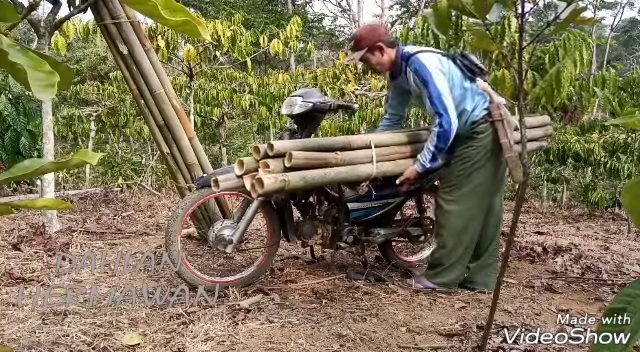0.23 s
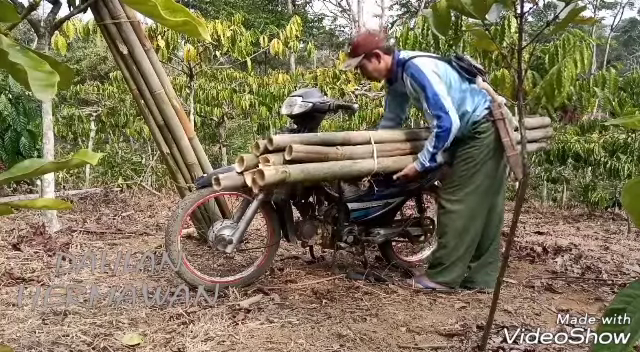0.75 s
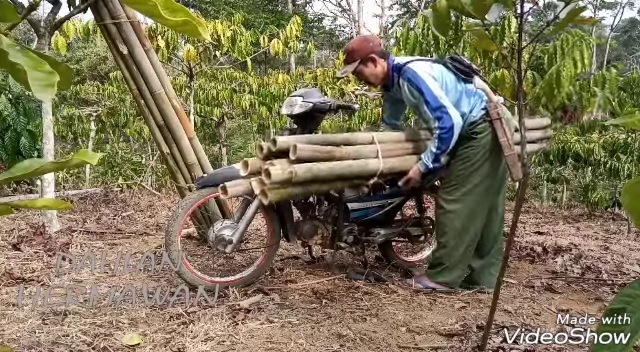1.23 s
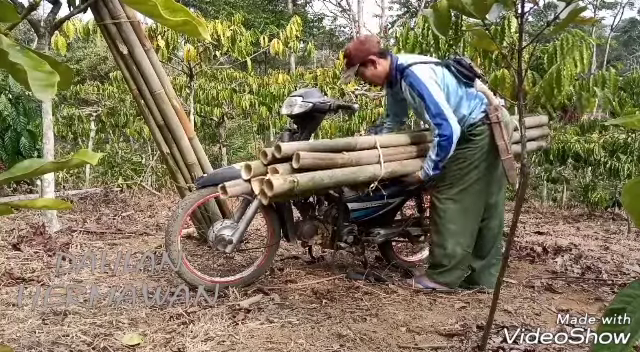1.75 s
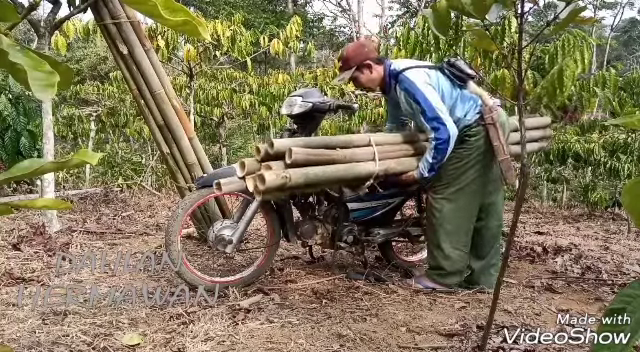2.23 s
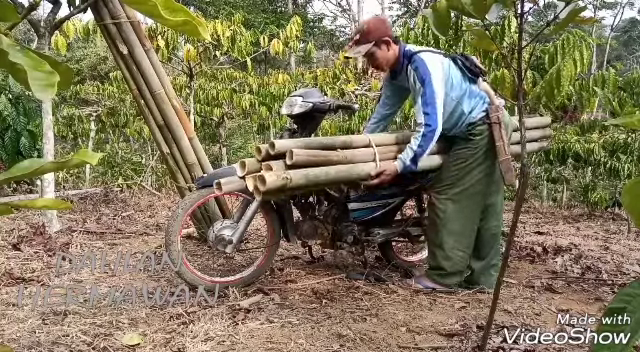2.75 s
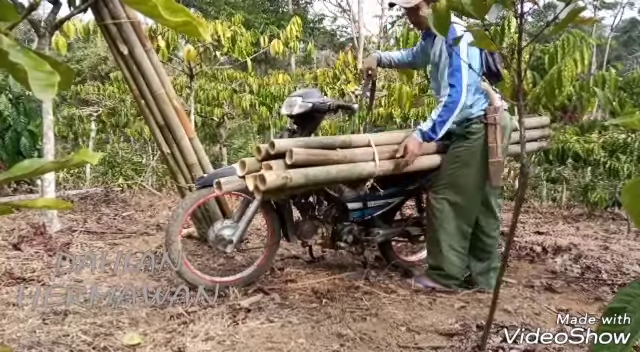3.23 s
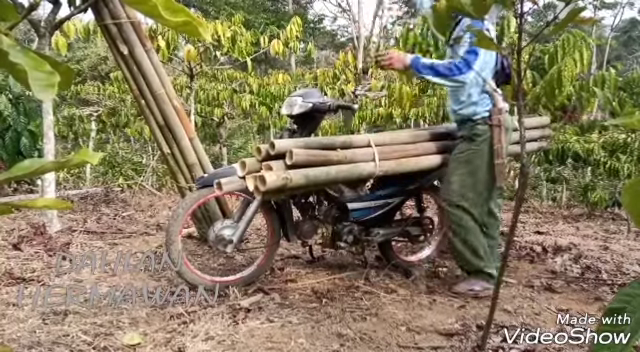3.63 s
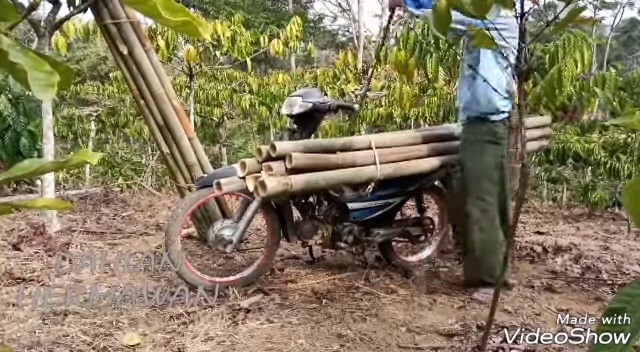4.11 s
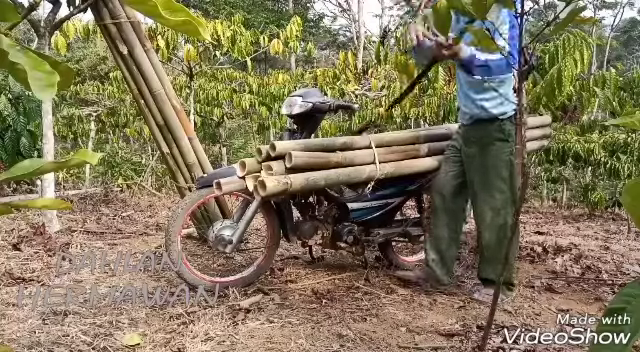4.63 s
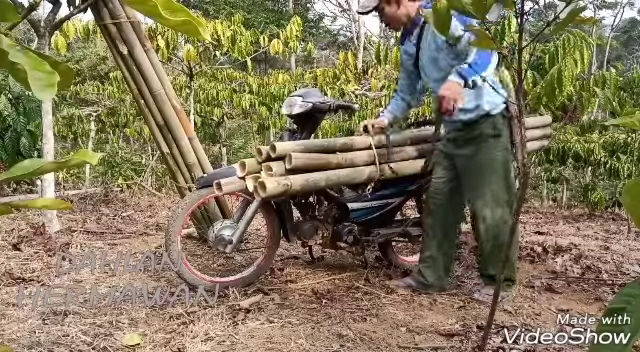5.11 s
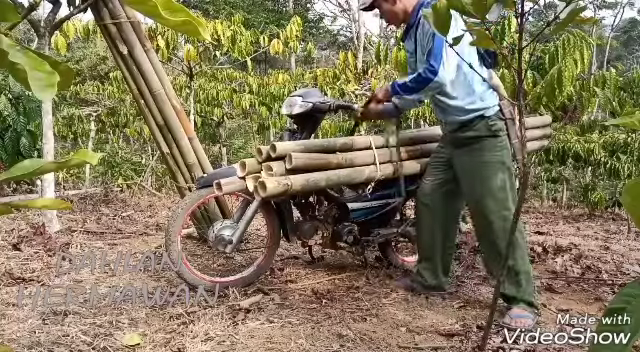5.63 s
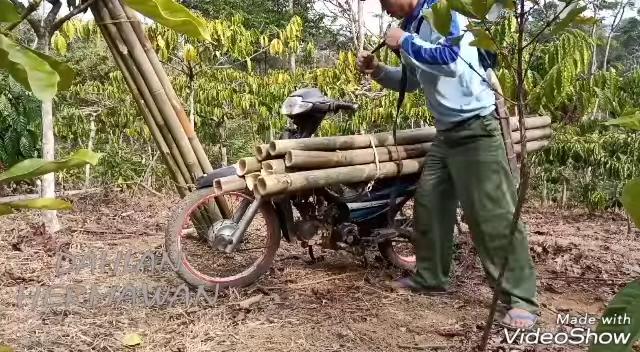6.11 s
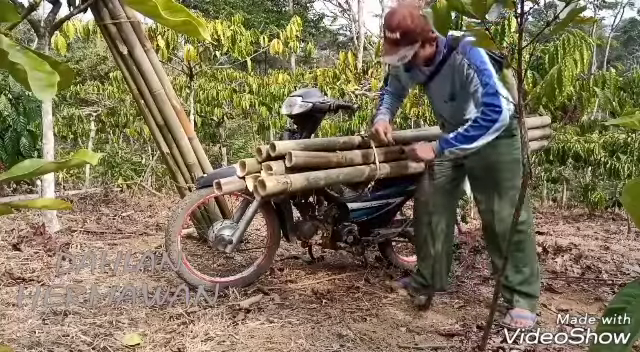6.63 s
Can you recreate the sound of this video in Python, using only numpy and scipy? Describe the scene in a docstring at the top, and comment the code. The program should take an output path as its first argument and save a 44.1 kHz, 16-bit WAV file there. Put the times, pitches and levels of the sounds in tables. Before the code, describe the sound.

Hollow bamboo poles clatter loudly onto a motorbike rack, knock and scrape sparsely, then a strap swishes over them with dry litter crunching outdoors.

```python
"""A low, distant rumble with leaf hiss lies under the whole outdoor scene: filtered noise.
From 0.2 s bamboo poles are shoved into place on a motorbike rack. Decaying modes make their knocks and hollow
notes, and stick-slip clicks their scrapes; they grow sparse after 2.4 s. Sharp snaps, as noise bursts, begin at 1.3 s.
From 2.8 s a strap is drawn out and laid over the bundle, swishing as swells of clicks; a drone passes at 3 to 4.5 s.
Dry litter crunches underfoot near 3.3 and 5.5 s, as clumped tiny breaks; one mono mix feeds both channels."""
import sys
import numpy as np
from scipy import signal
from scipy.fft import rfft, irfft
from scipy.io import wavfile

SR = 44100
rng = np.random.default_rng(int(sys.argv[2]) if len(sys.argv) > 2 else 0)


def output_pcm(signal):
    """Save a mono or channel-first signal as 16-bit PCM at the path in sys.argv[1].

    Samples are clipped to [-1, 1] before scaling.
    """
    pcm = np.clip(np.atleast_2d(signal).T, -1, 1) * 32767
    wavfile.write(sys.argv[1], SR, np.round(pcm).astype(np.int16))


N = 302526  # length in samples
RING = np.arange(SR // 2) / SR  # time axis of one short sound, t/s
LN_60_DB = np.log(1000)  # a fall of 60 dB as a natural logarithm


def amp(db):
    """Level law: decibels to amplitude gain."""
    return 10 ** (np.asarray(db) / 20)


def unit(x):
    """Normalisation to a root-mean-square value of one."""
    return x / np.sqrt(np.mean(x ** 2) + 1e-20)


def unit_attack(x, size=300):
    """Onset normalisation: the first size samples receive an rms of one."""
    return x / np.sqrt(np.mean(x[:size] ** 2) + 1e-20)


def read(points, hz):
    """Interpolation of (f/Hz, value) points on a logarithmic frequency axis."""
    f, value = np.transpose(points)
    return np.interp(np.log(hz + 1), np.log(f + 1), value)


def add(mix, s, sound):
    """Superposition: adds a sound to the mix in place from time s."""
    part = mix[max(round(s * SR), 0):][:len(sound)]
    part += sound[:len(part)]


def colour(x, points, size=4096):
    """Minimum-phase filtering: a causal response with the given (f/Hz, level/dB) magnitude."""
    hz = abs(np.fft.fftfreq(size, 1 / SR))
    log_gain = np.log(amp(read(points, hz)))
    # the Hilbert transform of the log magnitude gives the minimum phase
    taps = np.fft.ifft(np.exp(np.conj(signal.hilbert(log_gain)))).real
    return signal.oaconvolve(x, taps[:size // 2])[:len(x)]


def resonances(x, peaks):
    """Resonance: the sum of band-pass responses (f/Hz, width/Hz, level/dB) to a sound."""
    out = 0
    for hz, width, db in peaks:
        b, a = signal.iirpeak(hz, hz / width, fs=SR)
        out = out + amp(db) * signal.lfilter(b, a, x)
    return out


def drift(per_s):
    """Band-limited random modulation of unit rms, from per_s random values a second."""
    values = rng.standard_normal(int(per_s * N / SR) + 2)
    return unit(signal.resample(values, N))


def grains(per_s, spread_db):
    """Shot noise: random clicks of either sign and uneven size."""
    clicks = rng.random(N) < per_s / SR
    signs = rng.choice([-1, 1], N)
    sizes = amp(spread_db * np.minimum(rng.exponential(1, N), 4))
    return unit(clicks * signs * sizes)


def chatter(size, per_s=240, unevenness_db=4):
    """Intermittent contact: a gain that catches and lets go in quick uneven bursts."""
    bursts = np.arange(size) * per_s / SR
    steps = rng.uniform(-0.71, 1, int(bursts[-1]) + 2) * np.sqrt(3)
    return unit(amp(unevenness_db * np.interp(bursts, np.arange(len(steps)), steps)))


def gesture(start, length, db, shape):
    """Force envelope of one push or pull: attack, a sagging hold, release."""
    attack_s, sag_db, release_s = shape
    t = np.maximum(np.arange(N) / SR - start, 0)
    attack = 1 - np.exp(-(t / attack_s) ** 2)
    hold = amp(db - sag_db * np.minimum(t / length, 1))
    release = np.exp(-np.maximum(t - length, 0) / release_s)
    return attack * hold * release


def swell(s, width_s, db):
    """Gaussian envelope: a gain that rises smoothly to a peak at time s and falls again."""
    t = np.arange(N) / SR - s
    return amp(db) * np.exp(-np.minimum((t / width_s) ** 2, 20))


# outdoor background spectrum: f/Hz, relative level per Hz/dB
AIR_SPECTRUM = [(20, -13), (45, -20.5), (75, -4), (110, 1), (190, 0), (320, -9), (600, -13), (1300, -15.5),
                (3200, -20), (4500, -23), (5800, -32), (8000, -36.5), (11000, -56.5), (15000, -40)]
# spectrum of the distant drone: f/Hz, relative level/dB
DRONE_SPECTRUM = [(120, -42), (165, 2.5), (188, 10), (225, 14), (300, -44.5)]
AIR_DB = -46
DRONE_SWELL = (3, 1.45, -52.5)  # start/s, length/s, level/dB
DRONE_SHAPE = (0.15, 1, 0.12)  # attack/s, sag/dB, release/s


def background(waver_db=0.5):
    """Filtered noise: distant rumble and leaf hiss waver gently, and a low drone passes."""
    air = unit(colour(rng.standard_normal(N), AIR_SPECTRUM))
    air_gain = amp(AIR_DB + waver_db * drift(per_s=6.1))
    drone = unit(colour(rng.standard_normal(N), DRONE_SPECTRUM))
    return air_gain * air + gesture(*DRONE_SWELL, DRONE_SHAPE) * drone


# modes of three kinds of pole, before tuning and damping: f/Hz, relative level/dB, t60/s
POLE_MODES = { "long": [(216, 2, 0.29), (351, 0.5, 0.27), (569, 2, 0.35), (691, -8, 0.33), (766, -22, .28),
              (930, -1, 0.29), (1145, 12, 0.15), (1210, 0, .22), (1360, 6, .07), (1460, 5.5, 0.18),
              (1600, -1, 0.015), (1824, 12.5, 0.049), (2010, 2, .15), (2120, 5.5, 0.18), (2530, 16, 0.049),
              (2855, 10.5, 0.054), (3600, -3, 0.02), (3720, -3, 0.068)], "wide": [(215.6, -4, 0.32),
              (371, -8, .15), (520, -30, .25), (708, -6.5, 0.22), (941, 7, 0.099), (1043, 6, 0.099),
              (1214, 1.5, 0.076), (1294, 0, 0.12), (1370, -4, 0.14), (1595, -15, 0.087),
              (1667, -2.5, 0.051), (1918, -19, 0.15), (2134, -3, 0.13), (2790, -19, .025)],
              "short": [(234, -11.5, 0.34), (380, -21.5, 0.22), (543, -9.5, 0.26), (670, -11, 0.15),
              (942, -19.5, 0.19), (1130, -39, 0.015), (1185, 4.5, 0.068), (1270, -5, .047),
              (1735, 11, 0.03), (1860, -0.5, 0.041), (2263, -3.5, 0.065), (2950, -3, 0.063),
              (3285, -8, 0.088)]}


def pole_ring(pole, tuning, damping):
    """Modal superposition: one hollow pole rings freely, damped by the poles that lie on it."""
    modes = 0
    for hz, db, t60 in POLE_MODES[pole]:
        decay = np.exp(-LN_60_DB * damping * RING / t60)
        modes = modes + amp(db) * decay * np.sin(2 * np.pi * hz * tuning * RING)
    return unit_attack(modes)


# decay of the dense ring at a damping of one: f/Hz, t60/s
DENSE_T60 = [(100, 0.4), (400, 0.24), (1200, 0.16), (3000, 0.15), (8000, 0.21)]


def dense_ring(points, damping):
    """High modal density: overlapping modes act as noise whose decay depends on frequency."""
    hz, t, z = signal.stft(rng.standard_normal(len(RING)), SR, nperseg=256)
    fade = amp(-60 * t * damping / read(DENSE_T60, hz)[:, None])
    noise = signal.istft(z * fade, SR, nperseg=256)[1]
    return colour(noise[:len(RING)], points)


def disperse(x, lag_s, fast_hz=2200, slow_hz=170):
    """Dispersion: bending waves travel with the root of f, so the bass trails in a falling chirp."""
    hz = np.fft.rfftfreq(2 * len(x), 1 / SR)
    delay = lag_s * np.maximum(np.sqrt(fast_hz / np.maximum(hz, slow_hz)) - 1, 0)
    phase = -2 * np.pi * np.cumsum(delay) * hz[1]  # phase is the integral of group delay
    return irfft(rfft(x, 2 * len(x)) * np.exp(1j * phase))[:len(x)]


# knocks: t/s, kind of pole, tuning factor, relative level/dB, contact hardness f/Hz,
# bundle rattle relative level/dB, rack thump relative level/dB, grip damping factor
KNOCKS = [ (0.219, "long", 1, -12, 4760, -2.5, -3.5, 1.3), (0.2248, "short", 1.07, -22, 3000, 4.5, 3, 1.3),
          (0.2297, "wide", 1, -18, 1600, -5, -3, 2), (0.2427, "long", 1, -19, 3180, -4, -3, 1.4),
          (0.2499, "long", 1, -21.5, 3800, 1, -8, 1.6), (0.2529, "short", 1.05, -16, 2780, 0, -9, 1.1),
          (0.2582, "wide", .985, -16, 2600, -8, -2, 1.17), (0.2742, "long", 1, -23.5, 3640, -4, 4.5, 1.4),
          (0.293, "long", 1, -31.5, 4100, 3, -8, 2.1), (0.3027, "wide", 1, -26.5, 3600, -4, -1, 1.3),
          (0.311, "short", 1.1, -30.5, 2900, -11, -4, 1.8), (.316, "short", 1, -29.5, 3000, -1, -12, 1.9),
          (0.374, "short", 1.32, -37, 2980, -25, 2.5, 2),
          (0.398, "short", 1.87, -41.5, 3650, -11, -17, 0.95),
          (0.4372, "short", 1.35, -39, 3000, -18, -26, 1.4),
          (0.5605, "long", 0.77, -51.5, 1300, 12.5, 16.5, 1.5),
          (.585, "short", 1.3, -40.5, 2620, -5, -17, 2.2),
          (0.7549, "short", 0.93, -41, 5100, 1.5, -31, 1.2),
          (0.7658, "short", 0.94, -13, 4300, -10.5, -13, 0.87),
          (0.7694, "wide", 1, -17, 2000, -7, -14, 0.96), (0.7765, "wide", 1, -15, 2680, -1.5, -13, 1.26),
          (0.832, "short", 1.05, -35.5, 3020, -20, -13, 1.5),
          (0.8731, "wide", 1.04, -38, 2500, -17, 5, 1.2), (0.897, "short", 1.1, -38, 2800, -11, -12, 1),
          (0.9227, "short", 1.17, -33, 2610, -1, -6, 0.89),
          (0.93, "short", 1.1, -40.5, 2700, -6, -14, 0.78), (0.988, "wide", 1.1, -41.5, 2400, 4, 2, 1.2),
          (1.082, "wide", 0.92, -43, 1300, -7, -2, 2.3), (1.104, "short", 1.6, -43.5, 4080, 4, -10, 1.3),
          (1.15, "wide", 1.04, -29.5, 2080, 0.5, 0, 2.8), (1.153, "short", 1.05, -28.5, 3020, -3, -12, 1.4),
          (1.158, "long", 1, -34.5, 3380, 0.5, -14, 1.7), (1.174, "wide", 1, -29, 1800, -3, 2.5, 1.8),
          (1.2, "short", 1.15, -45, 2980, -1, -10, 1.3), (1.2103, "long", 1, -37, 3200, -7, -8, 1.5),
          (1.222, "short", 1.1, -37, 2900, 2, -10, 1.1),
          (1.2325, "short", 1.1, -27.5, 2150, -2.5, -11, 1.26), (1.285, "short", 1.1, -48, 3200, -5, -5, 1),
          (1.479, "wide", 1, -43, 2000, 4, 8.5, 0.36), (1.5164, "short", 1.15, -28, 2580, -8, -18, 1.5),
          (1.544, "short", 1.2, -39, 3000, -10, -10, 1.2), (1.556, "wide", 1.1, -40, 2200, 2, -13, 1.5),
          (1.574, "short", 1.1, -28.5, 2700, -8, -8, 1.3), (1.582, "short", 1.05, -35, 2400, 1, -7, 1.4),
          (1.6048, "long", 1, -29.5, 3520, -10, 5.5, 0.99), (1.612, "wide", 1, -28, 2500, 3, 0, 1.5),
          (1.6178, "short", 1.05, -28.5, 2980, -8, -21, 1.4), (1.646, "short", 1, -38, 2400, -12, -10, 1.5),
          (1.849, "short", 1.7, -35.5, 4560, 1.5, 4.5, 1.3), (1.8669, "short", 1, -14, 3520, -8, -10, 1.13),
          (1.893, "wide", 1, -36.5, 1100, -3, 6, 0.91), (1.968, "short", 1.1, -45, 3800, -8, 3, 1.1),
          (2.069, "short", 1.1, -44.5, 2200, 6, -20, 0.78), (2.166, "short", 1.1, -43, 2400, 1, -12, 1),
          (2.2248, "wide", .86, -27, 1750, -1, -1, 1.1), (2.318, "wide", 1.17, -36, 2200, -5, 7, 0.74),
          (2.347, "short", 0.9, -40, 2300, 5.5, 7.5, 0.55), (3.396, "wide", 0.69, -43.5, 1180, 0, 3.5, 1.1),
          (3.9968, "short", 1.02, -36, 1900, 6, -16, 1.8), (4.041, "short", 1.05, -39, 1700, 0, 0, 0.7),
          (4.282, "short", 1.1, -43.5, 1730, 3, -24, 1.2),
          (4.8953, "wide", 1.3, -34, 2150, -0.5, -23, 1.36),
          (5.285, "long", 0.94, -28.5, 4300, -10, -6, 6.7),
          (5.295, "wide", 0.77, -35.5, 2860, 0, -11, 0.91),
          (5.408, "short", 1.3, -42.5, 3600, 0.5, 0, 0.77), (6.58, "short", 1, -40.5, 4270, -3, -17, 2)]
# dense ring of the whole bundle: f/Hz, relative level/dB
BUNDLE_SPECTRUM = [(60, -15), (200, -2), (400, -22.5), (750, -5.5), (1200, 1), (2000, -2), (3000, -7),
                   (4200, -8), (7000, -18.5), (15000, -48)]
# dense ring of the rack below it: f/Hz, relative level/dB
RACK_SPECTRUM = [(30, 9), (60, -17), (85, -0.5), (140, -6.5), (230, -1.5), (420, -1), (800, -8),
                 (3000, -55)]
# crack of the hard bamboo skin: f/Hz, relative level/dB
CRACK_SPECTRUM = [(500, -32), (1500, 12.5), (3000, 7), (4500, -9), (6000, -4.5), (8000, -16), (11000, -11),
                  (15000, -22)]
# scale of the bass delay for a 0 dB blow, and the drop in level that halves it
BASS_LAG_S, LAG_HALVING_DB = 0.003127, 26


def knocks(rack_damping=0.95, bundle_damping=1.87, leak_db=-23,
           crack_db=-3, crack_t60=0.023, full_crack_hz=4500, crack_power=2.3):
    """Impact excitation: a blow cracks the skin, rings a pole, rattles the bundle, thumps the rack."""
    out = np.zeros(N)
    for s, pole, tuning, db, hard_hz, rattle_db, thump_db, grip in KNOCKS:
        rattle = chatter(len(RING)) * dense_ring(BUNDLE_SPECTRUM, bundle_damping * grip)
        wood = pole_ring(pole, tuning, grip) + amp(rattle_db) * unit_attack(rattle, size=700)
        # a soft contact lasts longer and wakes less treble
        contact = signal.butter(2, min(hard_hz, SR / 3), fs=SR, output="sos")
        body = signal.sosfilt(contact, wood) + amp(leak_db) * wood
        # the crack grows steeply with hardness
        burst = rng.standard_normal(len(RING)) * np.exp(-LN_60_DB * RING / crack_t60)
        crack_gain = amp(crack_db) * (hard_hz / full_crack_hz) ** crack_power
        crack = crack_gain * unit_attack(colour(burst, CRACK_SPECTRUM))
        rack = dense_ring(RACK_SPECTRUM, rack_damping * grip)
        thump = amp(thump_db) * unit_attack(rack, size=2000) / 2
        # the bass trails further after a heavy blow
        lag_s = BASS_LAG_S * 2 ** (db / LAG_HALVING_DB)
        add(out, s, amp(db) * (crack + thump + disperse(body, lag_s)))
    return out


# air columns in the open tubes: f/Hz, width/Hz, relative level/dB
TUBE_RESONANCES = [(240.5, 13, 0), (379.5, 28, -3), (545.3, 8, 1.5), (700, 41, -0.5), (792, 12, -1),
                   (932, 41, -4), (1262, 69, -5.5), (1444, 14, -16)]


def tubes(x, gain_db=-2):
    """Sympathetic resonance: the hollow poles answer every blow and scrape at their own notes."""
    return amp(gain_db) * (x + resonances(x, TUBE_RESONANCES))


# soft bumps that sound one pole's air column: t/s, note f/Hz, level/dB, t60/s
HOOTS = [(0.224, 213, -25, 0.071), (0.262, 403, -23, 0.07), (0.356, 347, -39, 0.14),
         (0.79, 374, -13.5, 0.066), (.814, 237.4, -19.5, 0.15), (0.991, 552, -29, 0.094),
         (1.078, 413, -30.5, 0.095), (1.153, 230, -47, 0.11), (1.176, 960, -35, 0.068),
         (1.89, 220, -34, .2), (2.222, 155, -34, 0.14), (2.246, 231, -35, 0.22), (5.519, 546, -29.5, 0.054)]
HOOT_RISE_S = 0.0044  # the air takes about this long to swing up


def hoots(overtone_db=-16):
    """Air-column resonance: a bumped pole sounds a short hollow note with a weak octave."""
    out = np.zeros(N)
    for s, hz, db, t60 in HOOTS:
        turn = 2 * np.pi * hz * RING
        rise = 1 - np.exp(-(RING / HOOT_RISE_S) ** 2)
        fade = rise * np.exp(-LN_60_DB * RING / t60)
        note = np.sin(turn) + amp(overtone_db) * np.sin(2 * turn)
        add(out, s, amp(db) * np.sqrt(2) * fade * note)
    return out


# slides of the poles on each other: start t/s, length t/s,
# scrape relative level/dB, rack rumble relative level/dB
SLIDES = [(0.24, 0.086, -32.5, -35), (0.348, 0.255, -46.5, -67), (0.78, 0.21, -32.5, -35.5),
          (1.068, 0.051, -37, -34), (1.141, 0.092, -34.5, -44), (1.267, 0.11, -46.5, -53),
          (1.429, 0.21, -44, -42), (1.513, 0.12, -41, -36.5), (1.877, 0.024, -33, -25.5),
          (1.95, 0.14, -43.5, -55), (2.067, 0.24, -41, -51), (2.21, 0.22, -46.5, -39.5),
          (3.912, 0.18, -43.5, -54), (4.87, 0.014, -43, -62), (4.97, 0.042, -42, -61),
          (5.572, .012, -46, -60)]
# colour of the sliding poles: f/Hz, relative level/dB
SLIDE_SPECTRUM = [(80, 7.5), (250, 0.5), (600, -3), (1300, -4.5), (3000, -0.5), (6000, -13.5), (15000, 6)]
# a slide catches, loses a little force as it goes, and stops: attack/s, sag/dB, release/s
SLIDE_SHAPE = (0.0095, 1.6, 0.025)


def slides(rumble_db=-2, hollow_db=-4):
    """Stick-slip friction: each kind of pole catches in uneven steps, and the rack rumbles along."""
    push = sum(gesture(s, length, db, SLIDE_SHAPE) for s, length, db, _ in SLIDES)
    shake = sum(gesture(s, length, db, SLIDE_SHAPE) for s, length, _, db in SLIDES)
    scrape = np.zeros(N)
    for pole in POLE_MODES:
        rattle = unit(dense_ring(BUNDLE_SPECTRUM, damping=1.7))
        hollow = amp(hollow_db) * unit(pole_ring(pole, tuning=0.99, damping=0.86))
        body = colour(rattle + hollow, SLIDE_SPECTRUM)
        catches = push * grains(per_s=130, spread_db=4.0)
        scrape += signal.oaconvolve(catches, body / np.linalg.norm(body))[:N]
    rumble = shake * unit(colour(grains(per_s=600, spread_db=1.0), RACK_SPECTRUM))
    return scrape / np.sqrt(len(POLE_MODES)) + amp(rumble_db) * rumble


# flicks of the strap and snaps of dry litter: peak t/s, relative level/dB,
# treble share relative level/dB, half-width t/s (short for a break, long for a scuff)
SNAPS = [(1.3158, -39.5, -21, 0.00077), (1.344, -40, -13, 0.0011), (2.019, -41.5, -19, 0.00077),
         (2.529, -45, -3, 0.00074), (3.126, -43, -27, 0.0049), (3.159, -35.5, -20, 0.0033),
         (3.175, -43.5, -15, 0.0093), (3.216, -41, -1, 0.0047), (3.231, -36, -15, 0.0051),
         (3.2509, -26, 6.5, 0.00096), (3.255, -31, -11, 0.0018), (3.282, -47, -9, 0.0068),
         (3.414, -55, 12.5, 0.0051), (4.311, -38, -30, 0.0032), (4.863, -36, -32, 0.0017),
         (5.083, -43, -16, 0.00079), (5.093, -37, -14, 0.00094), (5.103, -36, -13, 0.0023),
         (5.141, -39, -25, 0.00073), (5.51, -32, -21, 0.0029), (5.5247, -25.5, -6, 0.0047),
         (5.576, -38, -14, 0.0068), (6.116, -42, 4, 0.0011), (6.204, -56.5, 7, 0.0046),
         (6.691, -40.5, -18, 0.0026), (6.737, -40, -29, 0.0012)]
# body of a snap: f/Hz, relative level/dB
SNAP_SPECTRUM = [(200, -21), (550, 3.5), (900, -3), (1700, -4), (2600, 5), (3500, 9.5), (4600, -0.5),
                 (5700, -1.5), (7000, -11), (15000, -9)]
# treble of a snap: f/Hz, relative level/dB
FIZZ_SPECTRUM = [(2500, -69), (4500, 12.5), (5800, 9.5), (8000, -5.5), (11000, 3), (15000, -14)]


def snaps(ring_db=-12, ring_t60=0.11, tail_db=-27, tail_t60=0.57):
    """Transient with double decay: a burst, a short bright ring, faint scatter from plants around."""
    out = np.zeros(N)
    for s, db, treble_db, width_s in SNAPS:
        lead = 2 * width_s  # the sound starts this long before its peak
        t = RING - lead
        decay = -LN_60_DB * np.maximum(t, 0)
        ring = amp(ring_db) * np.exp(decay / ring_t60)
        tail = amp(tail_db) * np.exp(decay / tail_t60)
        fade = np.exp(-(t / width_s) ** 2) + (t > 0) * (ring + tail)
        crack, fizz = rng.standard_normal((2, len(RING)))
        sound = unit(colour(crack, SNAP_SPECTRUM)) + amp(treble_db) * unit(colour(fizz, FIZZ_SPECTRUM))
        add(out, s - lead, amp(db) * fade * sound)
    return out


# strokes of the strap or a sleeve over the poles: peak t/s, half-width t/s,
# swish relative level/dB, sizzle relative level/dB
STROKES = [(2.81, 0.041, -54.5, -54), (3.06, 0.055, -67, -58.5), (3.22, .12, -50.5, -53),
           (3.42, 0.062, -51.5, -49), (3.53, 0.058, -44.5, -47), (3.63, 0.072, -51, -52),
           (3.78, 0.14, -52, -53.5), (3.93, 0.065, -47.5, -68), (4.08, 0.1, -48, -82),
           (4.34, 0.11, -48.5, -53), (4.436, 0.067, -50, -47.5), (4.57, 0.1, -48, -44.5),
           (4.68, 0.058, -53, -54.5), (4.784, 0.074, -46.5, -46), (4.93, 0.05, -46, -55),
           (5.013, 0.035, -41, -42), (5.1, 0.057, -47.5, -55), (5.328, 0.073, -44.5, -48.5),
           (5.66, 0.17, -54, -53), (5.81, .04, -53, -64), (6.03, 0.062, -54.5, -68),
           (6.13, 0.087, -49.5, -56), (6.22, 0.025, -56, -58), (6.33, 0.054, -48.5, -85),
           (6.6, 0.044, -55, -53), (6.71, 0.045, -52, -60)]
# coarse catches: f/Hz, relative level/dB
SWISH_SPECTRUM = [(150, -10), (400, 8), (750, -27), (1300, 2), (2200, 5.5), (3100, 4), (4200, -3),
                  (5700, -34), (8000, -14.5), (12000, -47)]
# fine catches: f/Hz, relative level/dB
SIZZLE_SPECTRUM = [(2000, 4), (4500, 8), (5800, -11), (8000, -1.5), (11500, 0), (14000, 5.5), (15500, -3.5)]
# creak of the strap: f/Hz, width/Hz, relative level/dB
STRAP_RESONANCES = [(2870, 170, -10), (3640, 200, -4)]


def rubbing(swish_db=-1.0, sizzle_db=-1, flutter_db=1.5, strokes_db=-0.7):
    """Granular friction: strap and cloth drag over bamboo in uneven swells of tiny catches."""
    swish = sum(swell(s, width_s, db) for s, width_s, db, _ in STROKES)
    sizzle = sum(swell(s, width_s, db) for s, width_s, _, db in STROKES)
    catches = colour(grains(per_s=750, spread_db=2.2), SWISH_SPECTRUM)
    creaking = unit(catches + resonances(catches, STRAP_RESONANCES))
    coarse = amp(swish_db) * swish * creaking
    # a negative spread makes most of the uneven grains smaller
    fine_catches = unit(colour(grains(per_s=2500, spread_db=-4.5), SIZZLE_SPECTRUM))
    fine = amp(sizzle_db) * sizzle * fine_catches
    unevenness_db = flutter_db * drift(per_s=70) + strokes_db * drift(per_s=27)
    return (coarse + fine) * amp(unevenness_db)


# a shifting foot presses on dry litter: full weight t/s, level/dB
STEPS = [(3.25, -40.5), (5.535, -39.5)]
STEP_S = 0.075  # time for the weight to come on or go off


def crunch():
    """Fracture noise: each step is a swell of tiny breaks in dry leaves, which come in clumps."""
    weight = sum(swell(s, STEP_S, db) for s, db in STEPS)
    breaks = grains(per_s=700, spread_db=2.5)
    return weight * chatter(N) * unit(colour(breaks, SNAP_SPECTRUM))


BASS_CUT_HZ = 74  # the poles radiate little below this


def scene():
    """Superposition at one microphone: the sum of all sources, the same on both channels."""
    # thin poles radiate almost no deep bass
    radiation = signal.butter(4, BASS_CUT_HZ, "highpass", fs=SR, output="sos")
    bamboo = signal.sosfilt(radiation, tubes(knocks() + slides()))
    mono = background() + bamboo + hoots() + snaps() + rubbing() + crunch()
    return np.array([mono, mono])


# overall treble colour, with dips near 5.7 and 10 kHz: f/Hz, relative level/dB
TREBLE_COLOUR = [(3500, -3.5), (4700, -7.5), (5700, -21.5), (6600, -6.5), (7600, 1), (8800, 0.5),
                 (10200, -19.5), (11500, -10), (12500, -13), (13700, -5.5), (15500, -18)]
# faint noise that slightly widens the sound: f/Hz, relative level per Hz/dB
WIDTH_NOISE_SPECTRUM = [(30, -1), (150, -3.5), (600, -10), (2500, -8), (5000, -18), (15000, -23.5)]
WIDTH_NOISE_DB = -75.5
EDGE_HZ = 15500  # upper band limit


def record(dry):
    """Linear filtering and decorrelation: treble colour, faint widening noise, then the band limit."""
    channels = []
    for channel in dry:
        # drawn anew for each channel
        width_noise = unit(colour(rng.standard_normal(N), WIDTH_NOISE_SPECTRUM))
        channels.append(colour(channel, TREBLE_COLOUR) + amp(WIDTH_NOISE_DB) * width_noise)
    band_limit = signal.firwin(401, EDGE_HZ, window=("kaiser", 8), fs=SR)
    return signal.oaconvolve(np.array(channels), band_limit[None], "same")


dry = scene()
out = record(dry)
output_pcm(out)
```